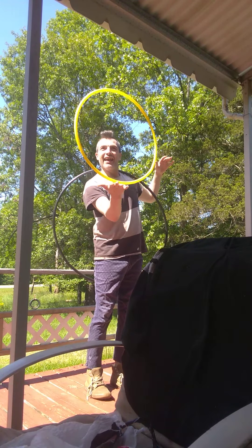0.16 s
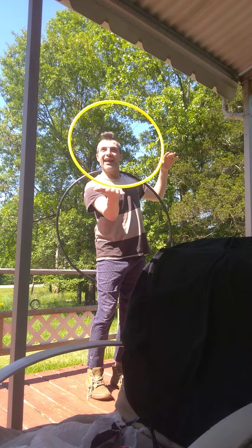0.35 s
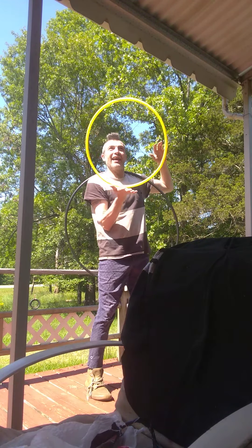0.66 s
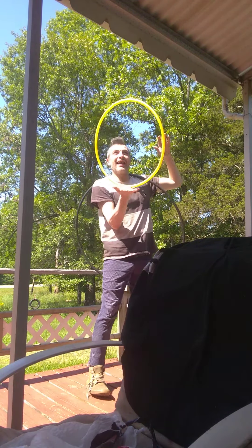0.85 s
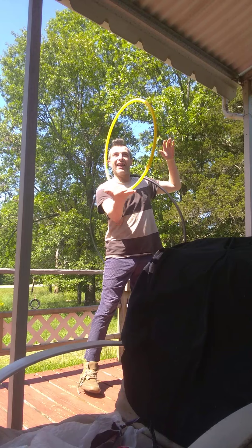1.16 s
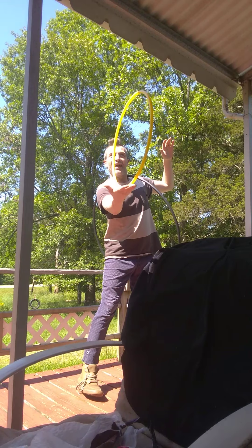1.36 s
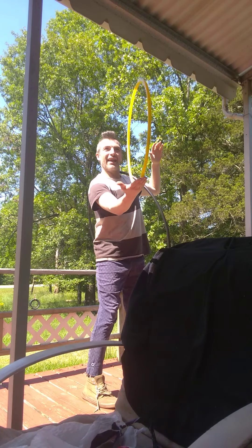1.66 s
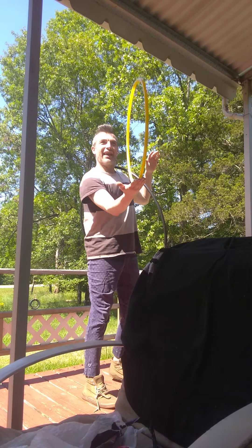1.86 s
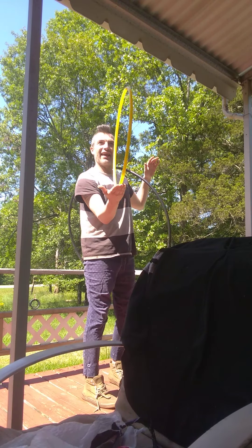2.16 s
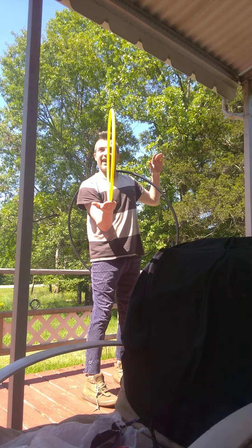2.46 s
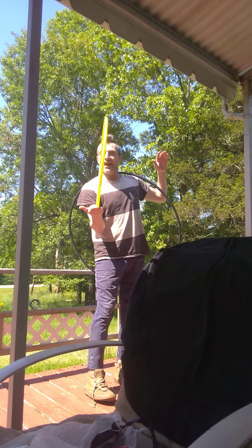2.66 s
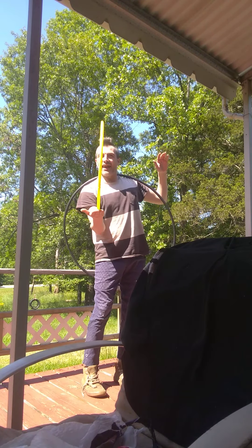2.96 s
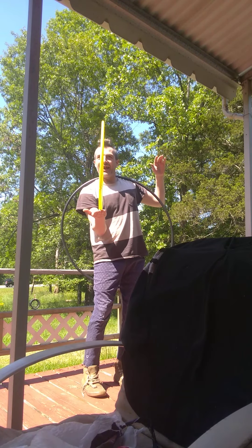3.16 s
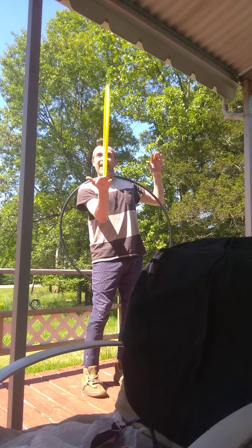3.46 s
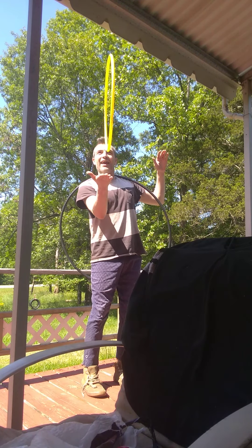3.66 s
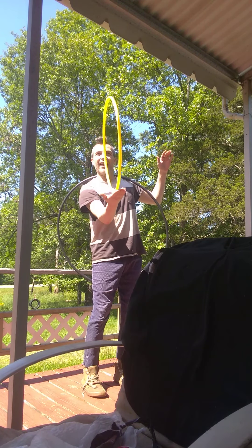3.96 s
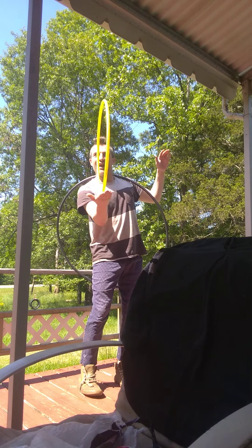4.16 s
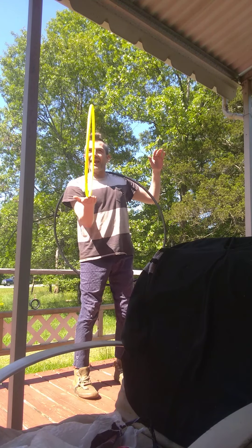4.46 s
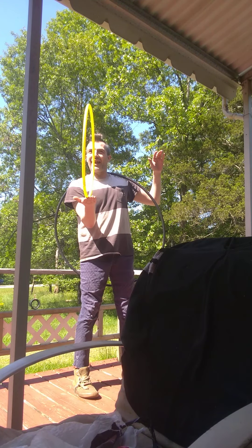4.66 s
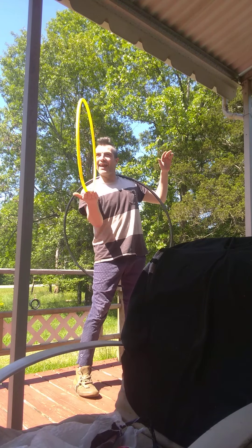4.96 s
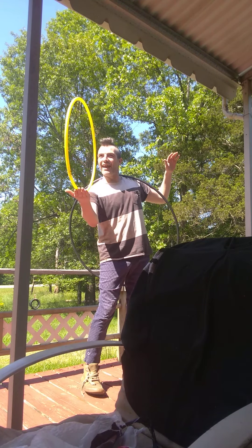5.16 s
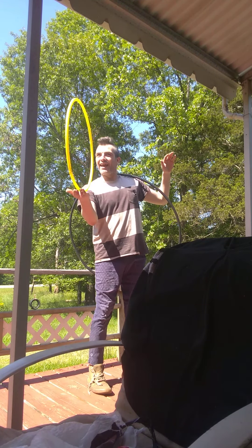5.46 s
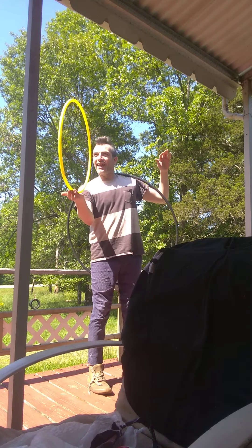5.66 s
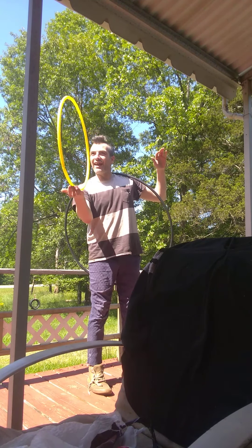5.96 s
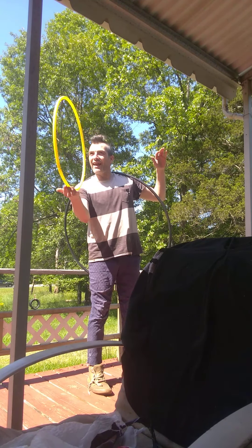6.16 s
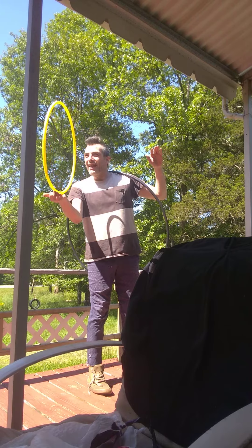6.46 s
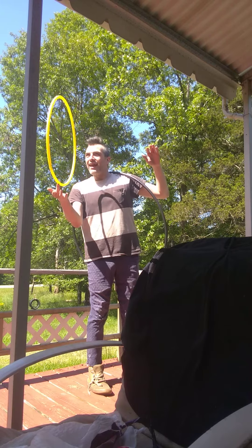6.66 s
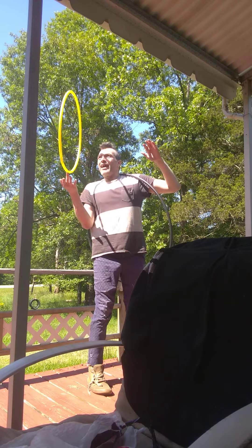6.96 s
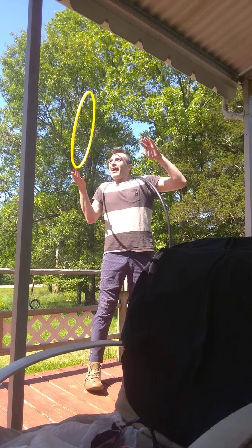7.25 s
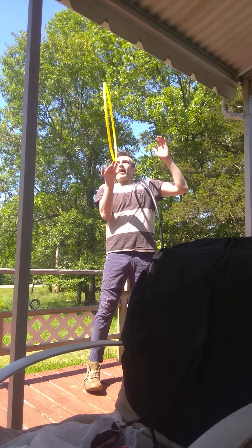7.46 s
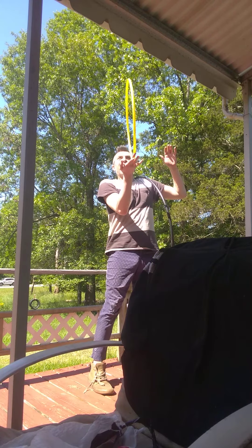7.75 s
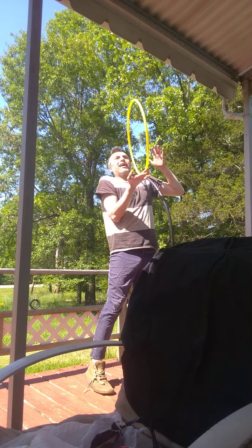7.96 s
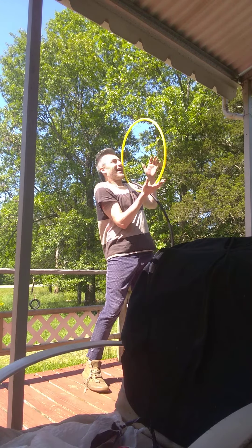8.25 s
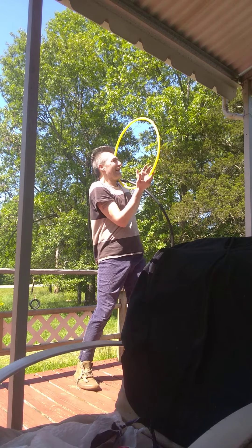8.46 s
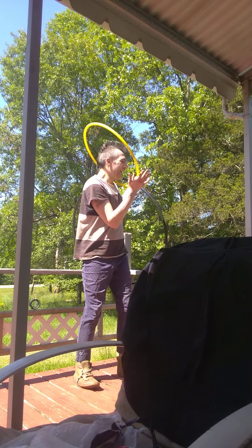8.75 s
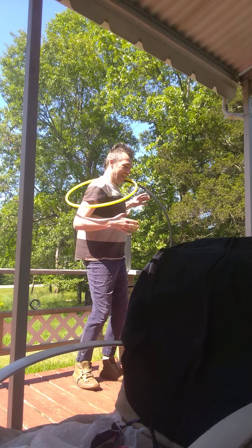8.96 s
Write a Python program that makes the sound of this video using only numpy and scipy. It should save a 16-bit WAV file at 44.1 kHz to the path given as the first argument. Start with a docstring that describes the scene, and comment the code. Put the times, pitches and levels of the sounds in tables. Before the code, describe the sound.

A distant V8 vehicle passes on a road beyond trees, its throbbing low drone swelling over tyre roar, with sparse birds and light hoop ticks.

```python
"""First a distant tyre roar over a low rumble; then a V8's exhaust drone swells, throbbing once per engine cycle.
The listener is on a garden deck; the vehicle passes at a steady 26 m/s on a road 63 m off, beyond trees.
The drone is a sum of engine orders, sinking in pitch by Doppler shift; gas rush and tyres are coloured noise.
Close to the two microphone ports, a plastic hoop being balanced makes ticks and scuffs of decaying noise.
A few birds call faintly as gliding sines with an echo, leaves rustle softly and a faint even hiss stays."""
import sys
import numpy as np
from scipy import signal
from scipy.fft import rfft, irfft, next_fast_len
from scipy.io import wavfile
from scipy.ndimage import uniform_filter1d, map_coordinates

SR = 44100
rng = np.random.default_rng(int(sys.argv[2]) if len(sys.argv) > 2 else 0)


def master(y):
    """Save y as 16-bit WAV."""
    cut = np.clip(np.atleast_2d(y).T, -1, 1)
    pcm = np.round(cut * 32767)  # scale
    wavfile.write(sys.argv[1], SR, pcm.astype(np.int16))


N = 402015  # samples, about 9.1 s

# The pass: engine cycles a second, road speed, distance to the road, moment of closest approach
CYCLE_HZ, SPEED_M_PER_S, DISTANCE_M, CLOSEST_S = 19.4528, 25.948, 62.66, 6.2261
SOUND_M_PER_S = 343
FIRING_ORDER = 8  # firings per engine cycle
BARK_HZ, BARK_WIDTH_HZ = 313, 46  # exhaust orders near this pitch bark
PORT_HZ = 1078  # above this the left port leads
PIVOT_HZ = 7000  # brightness tilts turn about this
TOP_HZ, LOW_CUT_HZ = 14250, 42  # band limits of the microphones

# All levels in the tables are relative; each layer sets its own gain.
# Half lengths and half widths are Gaussian sigmas; a bird note's length is its whole duration.
# Exhaust drone: [t/s, level of the firing tone/dB]
DRONE_LEVEL = [(0.0, -58), (0.3, -51), (1.0, -46.5), (1.35, -53.5), (1.88, -41.5), (2.15, -45), (2.4, -41),
               (2.72, -35), (2.86, -31.5), (3.38, -35.5), (3.55, -27), (3.95, -30), (4.1, -33.5),
               (4.17, -28.5), (4.47, -26.5), (4.82, -31), (4.94, -28.5), (5.05, -32), (5.4, -28.5),
               (5.6, -32), (6.3, -27.5), (6.5, -29.5), (7.14, -26), (7.25, -29), (7.84, -28.5), (7.93, -25),
               (8.2, -33), (8.62, -27), (8.93, -32.5), (9.11, -37.5)]
# Exhaust tone by view, each level against the firing tone:
# [order of the cycle, far/dB, approaching/dB, front/dB, beside/dB, leaving/dB, rear/dB]
EXHAUST_ORDERS = [(3, -8, -16, -34, -31.5, -39, -39), (5, 0, -3, -19.5, -6.5, -17.5, -18),
                  (6, -8, -19, -21, -13.5, -24.5, -32), (7, -21, -26.5, -12, -8, -7.5, -23.5),
                  (8, 0.5, -1, 4, 1, 1.5, 1), (9, -15, -6.5, -7, -4, -4.5, -7),
                  (10, -19, -5, -15.5, -20, -18, -12), (11, -15, -3.5, -8.5, -14.5, -11.5, -4.5),
                  (12, -18, -11, -18, -14, -14, -18), (13, -12, -11, -14, -13, -10, -10.5),
                  (14, -30, -27, -33, -16, -20.5, -25.5), (15, -22, -28.5, -28, -23.5, -32.5, -31),
                  (16, -7.5, -17.5, -34, -19, -28, -37), (17, -12.5, -22.5, -33, -28, -33.5, -36),
                  (18, -8.5, -22, -25.5, -23.5, -28.5, -33), (21, -20, -23, -22.5, -43, -25, -28),
                  (24, -14, -38.5, -36, -25.5, -29, -32.5), (26, -26, -32, -31, -21.5, -24, -27.5)]
# Place on the road of each of those six views: [past the closest point/m]
VIEW_PLACES = [-115, -92, -56, -21.5, 22.5, 63.5]
# Places where a reflection cancels one order: [order, centre past the closest point/m, half width/m, gain/dB]
REFLECTION_FADES = [(5, -44, 3.5, -18), (5, 53, 3, -14), (7, 50, 3, -10), (9, 0, 5, -7), (9, 53, 3, -9),
                    (10, -54, 2, -9), (11, -71, 2.5, -4), (11, -53, 2, -9), (11, -22, 5, -10),
                    (11, 1, 4, -6), (11, 18, 2.5, -8), (12, -11, 3, -16), (12, 51, 5, -7),
                    (13, -49, 3, -14), (13, 4.5, 1.8, -16), (13, 23, 2, -8), (13, 43, 3.5, -12),
                    (14, -11, 2, -14), (14, 12, 2, -14), (16, -12, 3.5, -12)]
# Brief rough burbles in the drone: [t/s, half length/s, centre f/Hz, level/dB]
BURBLE_EVENTS = [(5.73, .1, 168, -32), (6.35, .3, 320, -46), (6.4, .25, 235, -45)]
# Burble spectrum: [multiple of the centre f, level per Hz/dB]
BURBLE_SHAPE = [(.5, -40), (.77, -6), (1, 0), (1.25, -12), (1.8, -45), (3.5, -90)]

# Sounds beamed at the deck from one stretch of road: [centre past the closest point/m, half width/m, gain/dB]
# Exhaust orders near the bark pitch
BARK_STRETCH = (6, 9, 12)
# The two orders next to the firing tone: [centre/m, half width/m, gain/dB]
THROB_STRETCH = (-31, 15, 3.4)
# Gas rush: [centre/m, half width/m, gain/dB]
RUSH_STRETCH = (-1, 26, 1.9)
# Tyre hiss: [centre/m, half width/m, gain/dB]
HISS_STRETCH = (-16.5, 23, 1.9)

# Tyres: [t/s, roar level/dB, higher whirr level/dB]
TYRE_LEVELS = [(0.0, -43.5, -45), (0.38, -40.5, -44), (0.55, -40, -44.5), (0.78, -41, -43.5),
               (0.89, -38.5, -42), (1.1, -39.5, -42), (1.64, -38, -41), (1.8, -35.5, -40.5),
               (1.99, -34, -38), (2.1, -34, -40.5), (2.78, -38.5, -41), (3.1, -36.5, -40),
               (3.58, -36, -37.5), (4.08, -36.5, -39), (4.7, -33.5, -36.5), (5.1, -32.5, -37.5),
               (5.42, -32, -36.5), (5.78, -36.5, -39), (5.96, -32.5, -35.5), (6.2, -33, -37.5),
               (6.42, -33, -37), (6.72, -35, -37), (7.2, -34.5, -34.5), (7.66, -36, -37),
               (8.02, -35, -37.5), (8.17, -37, -39), (8.34, -33.5, -36.5), (8.6, -36, -37.5),
               (8.98, -34, -36), (9.11, -33.5, -34.5)]
# Low rumble: [t/s, level/dB]
RUMBLE_LEVEL = [(0.2, -59), (0.34, -58.5), (2.6, -53.5), (3.53, -53.5), (7.85, -57), (9.0, -52)]
# Brief narrow swells as the tread sings: [t/s, half length/s, f/Hz, level/dB]
TREAD_TONES = [(1.93, .1, 1130, -39), (2.08, .13, 850, -39), (5.97, .12, 815, -35), (6.38, .17, 805, -35.5),
               (6.42, .1, 1000, -37), (7.1, .2, 1100, -37), (7.25, .13, 1305, -36.5),
               (7.92, .11, 1065, -34.5), (8.33, .12, 1000, -35)]

# Noise spectra, all [f/Hz, level per Hz/dB]; first the low rumble
RUMBLE_SPECTRUM = [(15, -58.5), (30, -51), (40, -26.5), (50, -7.5), (60, -0.5), (80, -3), (130, -5.5),
                   (250, -14.5), (500, -60.5)]
# Exhaust gas rush: [f/Hz, level per Hz/dB]
RUSH_SPECTRUM = [(35, -70), (70, -30), (110, 2.5), (170, 8), (260, -2.5), (340, -1), (430, -5), (510, 3.5),
                 (590, -19), (800, -27.5), (1500, -85.5)]
# Tyre roar: [f/Hz, level per Hz/dB]
ROAR_SPECTRUM = [(60, -76), (300, -38.5), (550, -8.5), (680, -2), (790, 1.5), (1000, 1.5), (1150, -11.5),
                 (1500, -16.5), (2500, -66.5)]
# Tyre whirr: [f/Hz, level per Hz/dB]
WHIRR_SPECTRUM = [(200, -77), (600, -41.5), (900, -8.5), (1100, 1.5), (1350, -1.5), (1600, -5),
                  (2000, -14.5), (2800, -23.5), (5000, -76.5)]
# Tyre hiss: [f/Hz, level per Hz/dB]
HISS_SPECTRUM = [(200, -72), (1000, -23.5), (2200, 4), (2900, 0.5), (3500, -4.5), (4200, -10.5),
                 (5000, -13.5), (6500, -21), (8000, -24), (10000, -30), (14000, -48)]
# Faint even hiss: [f/Hz, level per Hz/dB]
AIR_SPECTRUM = [(1000, -15), (4000, -2.5), (8000, -4), (11000, -7), (14000, -14.5)]
# Hoop and hand contacts before their own tilt: [f/Hz, level per Hz/dB]
TICK_SPECTRUM = [(800, -31), (2500, -7), (4500, 5.5), (7500, 2.5), (11000, -7), (14000, -11)]
# Leaf rustle: [f/Hz, level per Hz/dB]
LEAF_SPECTRUM = [(1500, -28.5), (4000, 2.5), (6000, 1.5), (9000, -10.5), (14000, -25.5)]
# Shoes and cloth before their own tilt: [f/Hz, level per Hz/dB]
SCUFF_SPECTRUM = [(1500, -16.5), (4500, 3), (8000, 0), (11000, -2.5), (14000, -10.5)]

# Likeness of distant noise at the two ports: [f/Hz, left-right likeness 0-1]
PORT_LIKENESS = [(50, .55), (130, .72), (300, .68), (480, .92), (650, .97), (1100, .99), (1600, .84),
                 (2500, .72), (5000, .64), (7000, .54), (9000, .18)]
# Level difference of the ports: [f/Hz, left minus right/dB]
PORT_LEAN = [(60, 6.5), (250, 2.5), (550, 4.5), (800, 3), (1100, -0.5), (1600, 0.5), (2300, 4.5),
             (3300, 0.5), (5000, 1.5), (9000, 2.5)]

# Hoop and hand contacts: [t/s, level/dB, t60/s, brightness/dB per octave]
TICK_EVENTS = [(3.924, -51.5, .08, 2.5), (7.146, -51, 0.15, 0), (7.451, -49, .15, -5.5),
               (8.0727, -44, .03, 1.5), (8.0759, -37.5, .05, -2), (8.083, -46, .06, 1),
               (8.0875, -45, .08, -3), (8.105, -50.5, .08, 1), (8.136, -48, .06, 2), (8.141, -46, 0.087, 2),
               (8.15, -49, .09, 0.5), (8.416, -40.5, .035, 0), (9.046, -44, .08, 3.5)]
# Shoes and cloth: [t/s, rise/s, fall/s, level/dB, brightness/dB per octave]
SCUFF_EVENTS = [(0.603, 0.021, .035, -62, 5.5), (0.703, 0.018, .03, -68.5, 0.5), (0.83, .02, .03, -71, 2),
                (1.775, 0.017, 0.033, -61.5, -7.5), (2.935, .028, .04, -62.5, -5),
                (4.213, 0.012, 0.02, -62, -10), (7.49, 0.02, 0.027, -70, 1.5), (8.1, 0.022, .04, -62.5, -2),
                (8.43, 0.011, .03, -64.5, -3), (8.585, 0.011, 0.029, -65, -2.5),
                (8.91, 0.022, 0.055, -67, -2.5)]
# Bird notes: [t/s, length/s, start f/Hz, middle f/Hz, end f/Hz, level/dB, rasp as a share of the pitch]
BIRD_NOTES = [(1.025, .04, 3130, 2980, 2720, -44, .025), (1.144, .022, 3300, 3000, 2700, -45.5, .035),
              (1.19, .1, 2700, 2650, 2650, -53, .11), (.79, 0.22, 6250, 5800, 5400, -68, .04),
              (1.68, 0.22, 7500, 5900, 3700, -65.5, .07), (1.79, .2, 4300, 3900, 3700, -62, .07),
              (2.358, .06, 2900, 2990, 2990, -46, .009), (5.082, 0.13, 3800, 3950, 4100, -61.5, .06),
              (6.51, .22, 3350, 3430, 3400, -51.5, .065), (7.565, .05, 2880, 2920, 2880, -50.5, .02),
              (8.986, 0.13, 3400, 3450, 3500, -54.5, .05)]
# Swells of leaf rustle: [t/s, half length/s, level/dB]
LEAF_SWELLS = [(1.698, 0.14, -65.5), (2.15, 0.2, -75), (5.15, .35, -64.5), (6.197, 0.38, -64)]


def amp(db):
    """Decibels to gain."""
    return np.exp(np.asarray(db) * (np.log(10) / 20))


def unit(x):
    """Scale to rms 1."""
    return x / np.sqrt(np.mean(x ** 2) + 1e-20)


def along(points, hz):
    """(f/Hz, value) points read on a log frequency axis."""
    f, value = np.transpose(points)
    return np.interp(np.log(hz + 1), np.log(f + 1), value)


def curves(rows):
    """One value per sample for each column after the time."""
    s, *columns = np.transpose(rows)
    return [np.interp(np.arange(N) / SR, s, column) for column in columns]


def wobble(rate):
    """A smooth random curve, rate knots a second."""
    coarse = np.arange(0, N + 64, 64)
    knots = map_coordinates(rng.standard_normal(int(N * rate / SR) + 4), [coarse * rate / SR])
    # straight lines join the coarse points
    ramp = np.arange(64) / 64
    return (knots[:-1, None] + np.diff(knots)[:, None] * ramp).ravel()[:N]


def swell(s, length, db):
    """A gain that rises and falls smoothly around one moment."""
    return amp(db) * np.exp(-.5 * ((np.arange(N) / SR - s) / length) ** 2)


def filtered(x, response):
    """Apply a complex response of frequency to x."""
    m = next_fast_len(N + SR // 4)
    return irfft(rfft(x, m) * response(np.fft.rfftfreq(m, 1 / SR)), m)[..., :N]


def ports(hz):
    """The two microphone ports: left is louder at most pitches, and leads in the treble."""
    lead = np.pi * np.maximum(hz / PORT_HZ - 1, 0)
    side = np.array([[.5], [-.5]])
    return amp(side * along(PORT_LEAN, hz)) * np.exp(1j * side * lead)


def noise(colour, ripple=0.51):
    """Distant stereo noise of rms 1; the likeness of the ports ripples through the treble."""
    m = next_fast_len(N)
    hz = np.fft.rfftfreq(m, 1 / SR)
    comb = 1 + ripple * np.clip(hz / PORT_HZ - 1, 0, 1) * np.cos(2 * np.pi * hz / PORT_HZ)
    likeness = np.clip(along(PORT_LIKENESS, hz) * comb, 0, 1)
    turn = np.arccos(likeness) / 2  # splits the power into shared and opposed parts
    spectra = rfft(rng.standard_normal((2, m))) * amp(along(colour, hz))
    common, apart = spectra * [np.cos(turn), np.sin(turn)]
    return unit(irfft(np.array([common + apart, common - apart]) * ports(hz), m)[:, :N])


def place():
    """Metres along the road past the closest point, for each sample."""
    return SPEED_M_PER_S * (np.arange(N) / SR - CLOSEST_S)


def receding():
    """Sine of the bearing: -1 coming straight on, 0 abreast, 1 going straight away."""
    return place() / np.hypot(place(), DISTANCE_M)


def beam(centre_m, width_m, db):
    """A gain in dB that swells and fades as the vehicle crosses one stretch of road."""
    return db * np.exp(-.5 * ((place() - centre_m) / width_m) ** 2)


def patchy(x, depth_db=1.05):
    """Narrow bands swell and fade on their own, as tread tones come and go."""
    bands = signal.stft(x, nperseg=1024)[2]
    field = rng.standard_normal(bands.shape[1:])
    field = uniform_filter1d(field, size=3, axis=0)  # across frequency
    field = uniform_filter1d(field, size=14, axis=1)  # across time
    return signal.istft(bands * amp(depth_db * unit(field)), nperseg=1024)[1][:, :N]


def add(sound, x, s, tilt_db):
    """Mix in the half second of x around one moment, brightened by tilt_db per octave."""
    span = slice(round(s * SR) - SR // 4, round(s * SR) + SR // 4)
    piece = x[:, span]
    # the tilt levels out one octave below the pivot
    octaves = np.log2(np.maximum(np.fft.rfftfreq(SR, 1 / SR) / PIVOT_HZ, .5))
    sound[:, span] += irfft(rfft(piece, SR) * amp(tilt_db * octaves), SR)[:, :piece.shape[1]]


def road(roar_db=0.5, whirr_db=2.0, hiss_db=-51.5, rumble_db=6, hiss_follow=0.58, flutter_db=0.46):
    """Tyres on the road roar, whirr and hiss as fluttering bands of noise, over a low rumble."""
    roar, whirr = curves(TYRE_LEVELS)
    level_db = (roar + whirr) / 2
    hiss = hiss_db + hiss_follow * (level_db - level_db.mean()) + beam(*HISS_STRETCH)
    tyres = amp(roar + roar_db + flutter_db * wobble(21)) * noise(ROAR_SPECTRUM)
    tyres += amp(whirr + whirr_db + flutter_db * wobble(17)) * noise(WHIRR_SPECTRUM)
    tyres += amp(hiss + flutter_db * wobble(17)) * noise(HISS_SPECTRUM)
    rumble = amp(curves(RUMBLE_LEVEL)[0] + rumble_db) * noise(RUMBLE_SPECTRUM)
    return patchy(tyres) + rumble


def exhaust(waver_db=1.5, tone_waver_db=0.7, flicker_db=1.42, drone_db=-1.17, blur_s=0.82, throb_db=-2.0,
            lean_db=0.4, pan_db=1.3, rush_db=-5.5, chuff=0.27):
    """Uneven firing puts orders of the engine cycle round the firing tone; its two neighbours beat as a throb."""
    heard_hz = CYCLE_HZ / (1 + receding() * SPEED_M_PER_S / SOUND_M_PER_S)  # Doppler shift
    angle = 2 * np.pi * (np.cumsum(heard_hz) / SR - .05)
    level_db, = curves(DRONE_LEVEL)
    # the quick dips belong to the firing tone; the other orders follow only its slow swell
    swell_db = uniform_filter1d(level_db, size=max(int(blur_s * SR), 1))
    metres = place()
    bark, throb = beam(*BARK_STRETCH), throb_db + beam(*THROB_STRETCH)
    side = np.array([[.5], [-.5]])
    tone = np.zeros((2, N))
    for order, *view_db in EXHAUST_ORDERS:
        distance = abs(order - FIRING_ORDER)
        # the firing tone and its neighbours start in step
        offset = rng.uniform(0, 2 * np.pi) * (distance > 1)
        # side orders vary more from cycle to cycle
        loose = np.sqrt(min(distance, 2) + .5)
        drift = loose * (.09 * wobble(17) + .15 * wobble(3))
        # echoes off the deck roof shift each order a little between the ports
        spread = side * loose * .2 * wobble(2)
        db = (swell_db if distance else level_db) + np.interp(metres, VIEW_PLACES, view_db)
        db += bark * np.exp(-.5 * ((order * CYCLE_HZ - BARK_HZ) / BARK_WIDTH_HZ) ** 2)
        db += throb * (distance == 1)
        db += (waver_db * min(distance, 2) + tone_waver_db) * wobble(4.5) / 2
        db += flicker_db * wobble(19)
        db += sum(beam(*fade) for faded, *fade in REFLECTION_FADES if faded == order)
        tone += amp(db) * np.sqrt(2) * np.cos(order * angle + offset + drift + spread)
    # the drone moves from left to right with the vehicle
    pan = side * (lean_db - pan_db * receding())
    drone = filtered(tone * amp(drone_db + pan), ports)
    # gas leaves the pipe in one puff per firing, and its rush carries through the trees as the tyre noise does
    puffs = 1 + chuff * np.cos(FIRING_ORDER * angle)
    rush = amp(curves(TYRE_LEVELS)[0] + rush_db + beam(*RUSH_STRETCH)) * noise(RUSH_SPECTRUM)
    burble = np.zeros((2, N))
    for s, length, hz, db in BURBLE_EVENTS:
        colour = [(hz * multiple, level) for multiple, level in BURBLE_SHAPE]
        burble += swell(s, length, db) * noise(colour)
    return drone + puffs * (rush + burble)


def even_hiss(air_db=-76):
    """A faint steady noise under everything."""
    return amp(air_db) * noise(AIR_SPECTRUM)


def near_noise(colour, left_db=4.0):
    """Noise close to the microphones: independent at the two ports and stronger on the left."""
    x = filtered(rng.standard_normal((2, N)), lambda hz: amp(along(colour, hz)))
    return unit(x) * amp([[left_db], [-left_db]])


def handling(tick_db=-7, snap_db=4, snap_t60=0.0098, ring_db=-10, grain_db=2.2):
    """Light contacts snap and die quickly; grainy scuffs swell and trail off; each has its own brightness."""
    t = np.arange(N) / SR
    sound = np.zeros((2, N))
    crack = near_noise(TICK_SPECTRUM)
    age = t[:SR // 4]
    for s, db, t60, tilt_db in TICK_EVENTS:
        snap = amp(snap_db - 60 * age / snap_t60)
        ring = amp(ring_db - 60 * age / t60)
        blow = amp(db + tick_db) * (snap + ring)
        add(sound, np.pad(blow, (round(s * SR), N))[:N] * crack, s, tilt_db)
    rub = near_noise(SCUFF_SPECTRUM) * amp(grain_db * wobble(250))
    for s, rise, fall, db, tilt_db in SCUFF_EVENTS:
        stroke = amp(db) * np.exp(-np.where(t < s, .5 * ((t - s) / rise) ** 2, (t - s) / fall))
        add(sound, stroke * rub, s, tilt_db)
    return sound


def birds(t60=0.46, call_db=0, echo_db=-0.5):
    """Short arching notes, some pure and some raspy, with an echo from the trees."""
    song = np.zeros(N + SR)
    quaver = wobble(500)
    for s, length, start_hz, middle_hz, end_hz, db, rasp in BIRD_NOTES:
        u = np.linspace(0, 1, int(length * SR))
        arch = np.polyval(np.polyfit([0, .5, 1], [start_hz, middle_hz, end_hz], 2), u)
        hz = arch * (1 + rasp * np.roll(quaver, int(s * SR))[:len(u)])
        note = amp(db + call_db) * np.sin(np.pi * u) * np.sin(2 * np.pi * np.cumsum(hz) / SR)
        song[int((s - length / 2) * SR):][:len(u)] += note
    # the echo is a decaying burst of noise, different at each port
    trees = rng.standard_normal((2, SR // 2)) * amp(-60 * np.arange(SR // 2) / SR / t60)
    trees /= np.linalg.norm(trees[0])
    echo = signal.fftconvolve(song[None], trees, axes=1)[:, :N]
    return song[:N] + amp(echo_db) * echo


def leaves():
    """Soft swells of rustling in the trees, as shaped noise."""
    return sum(swell(*rustle) for rustle in LEAF_SWELLS) * noise(LEAF_SPECTRUM)


def tread(width_hz=55):
    """Narrow, unsteady tones that the tread sings on some stretches of asphalt."""
    t = np.arange(N) / SR
    song = np.zeros(N)
    for s, length, hz, db in TREAD_TONES:
        # a random complex envelope broadens the tone into a narrow band
        quaver = wobble(width_hz) + 1j * wobble(width_hz)
        song += swell(s, length, db) * np.real(quaver * np.exp(2j * np.pi * hz * t))
    return filtered(song, ports)


def scene():
    """The vehicle on the road, the hoop on the deck, the garden and a faint even hiss."""
    vehicle = road() + exhaust() + tread()
    return vehicle + even_hiss() + handling() + birds() + leaves()


def record(dry):
    """The microphones roll off the deepest bass and keep nothing above their band limit."""
    return filtered(dry, lambda hz: (hz < TOP_HZ) / np.sqrt(1 + (LOW_CUT_HZ / (hz + 1)) ** 8))


dry = scene()
out = record(dry)
master(out)
```